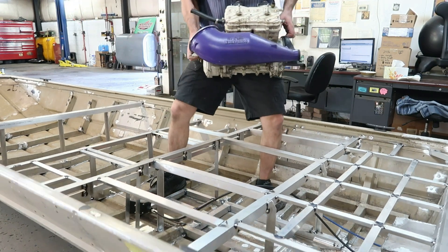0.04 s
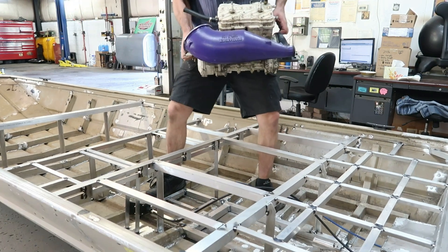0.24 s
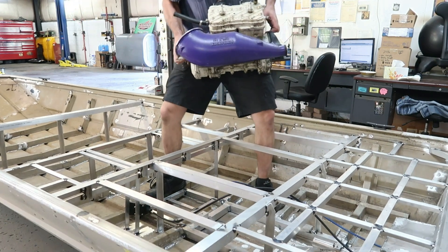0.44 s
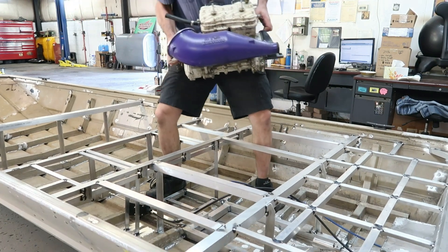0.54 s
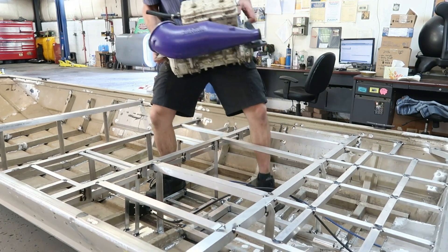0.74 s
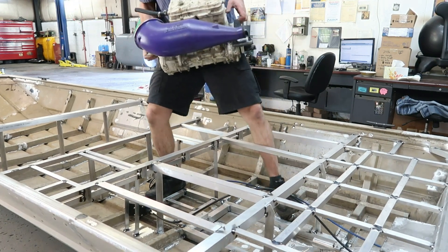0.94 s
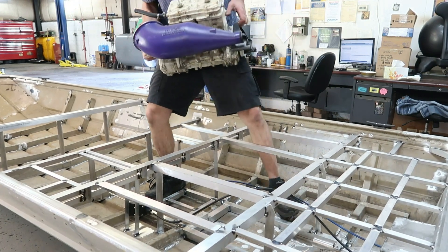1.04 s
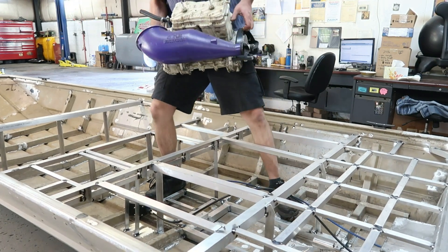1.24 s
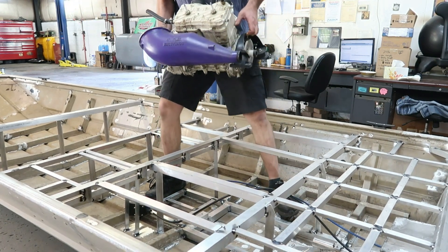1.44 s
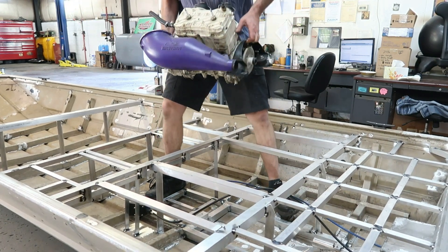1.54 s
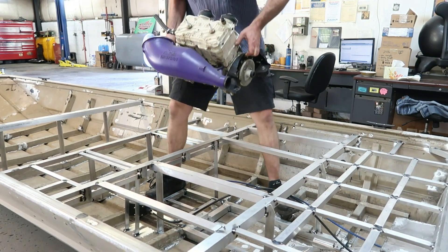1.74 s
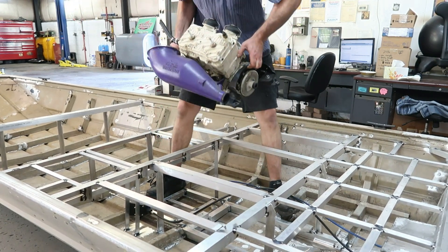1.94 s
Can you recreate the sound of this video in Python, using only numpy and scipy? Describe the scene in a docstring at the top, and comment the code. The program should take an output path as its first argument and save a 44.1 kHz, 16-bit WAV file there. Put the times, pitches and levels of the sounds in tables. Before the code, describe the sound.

Hollow metal knocks on an aluminium boat hull in a workshop. A faint ring fades over low ventilation hum and a thin whine. At 0.25 s a loud clonk hits, then a softer, duller one at 0.48 s, both with plate ring and room tail. Low hull booms and rumble continue unevenly until about 1.3 s, with shoe scuffs around 0.3-0.6 and 0.95 s. A faint boom near 1.45 s, then hum.

```python
"""Heavy engine carried across a boat's framing

Someone carrying a heavy engine steps across the framing of an aluminium boat in a workshop.
Shaped noise and wavering sines make the shop and its whine; a band of noise makes a fading metal ring.
The hollow hull booms as dying low modes over filtered rumble, under the shifting weight.
The frame knocks twice on the hull with pitch-bent partials, plate ring, echoes and a diffuse tail.
Shoes scuff and squeak on the metal as grainy and narrow-band noise."""
import sys
import numpy as np
from scipy import signal
from scipy.fft import rfft, irfft
from scipy.io import wavfile
from scipy.ndimage import uniform_filter1d

SR = 44100
rng = np.random.default_rng(int(sys.argv[2]) if len(sys.argv) > 2 else 0)


def wrap_up_sound(samples):
    """Save the sound to the file named by the first command line argument, as 16-bit audio."""
    columns = np.atleast_2d(samples).T
    # keep every value between -1 and 1, then stretch to whole-number steps
    tamed = np.clip(columns, -1, 1)
    steps = np.round(tamed * 32767).astype(np.int16)
    wavfile.write(sys.argv[1], SR, steps)


N = 88200
T, HZ = np.arange(N) / SR, np.fft.rfftfreq(N, 1 / SR)


def amp(db):
    """Decibels to gain."""
    return 10 ** (np.asarray(db) / 20)


def unit(x):
    """Scales to rms 1."""
    return x / np.sqrt(np.mean(x ** 2) + 1e-20)


def read(points, hz):
    """Reads a table on a log-frequency axis."""
    f, value = np.transpose(points)
    return np.interp(np.log(hz + 1), np.log(f + 1), value)


def level(points):
    """Gain over time from a fader curve of times and decibels."""
    return amp(np.interp(T, *np.transpose(points)))


def add(mix, s, sound):
    """Mixes a sound in at time s."""
    part = mix[..., max(round(s * SR), 0):]
    part += sound[..., :part.shape[-1]]


def tilt(hz, db_per_octave):
    """Slope in dB that crosses zero at 1 kHz and stays level below 300 Hz."""
    return db_per_octave * np.log2(np.maximum(hz, 300) / 1000)


def decay(t, t60):
    """Exponential decay that falls by 60 dB in t60 seconds."""
    return np.exp(-np.log(1000) * t / t60)


def swell(s, rise, t60):
    """Rises smoothly to a peak at s, then dies away."""
    attack = np.exp(-(np.minimum(T - s, 0) / rise) ** 2)
    return attack * decay(np.maximum(T - s, 0), t60)


def hump(peak_s):
    """Rises from nothing to 1 at peak_s, then dies away."""
    return T / peak_s * np.exp(1 - T / peak_s)


def resonance(hz, width):
    """Gain of a resonant peak, down to half at half the width either side."""
    return 1 / (1 + (2 * (HZ - hz) / width) ** 2)


def wander(seconds):
    """Random drift of rms 1, smoothed twice over the given time."""
    size = max(int(seconds * SR), 1)
    smooth = uniform_filter1d(rng.standard_normal(N), size)
    return unit(uniform_filter1d(smooth, size))


# likeness of left and right: (frequency [Hz], correlation [-1 to 1])
STEREO_LIKENESS = [(100, 1), (500, 0.97), (1000, 0.94), (2000, 0.87), (4000, 0.54), (8000, -0.046),
                   (12000, -0.28)]


def noise(colour_db):
    """Stereo noise of a given colour and rms 1, alike in the bass and wide in the treble."""
    mid, side = rfft(rng.standard_normal((2, N)))
    same = np.clip(read(STEREO_LIKENESS, HZ), -1, 1)
    mid, side = mid * np.sqrt(1 + same), side * np.sqrt(1 - same)
    return unit(irfft(np.array([mid + side, mid - side]) * amp(colour_db), N))


def modes(table, ratio=1, tilt_db=0, scatter=1):
    """Sums dying sines, one per resonance; scatter spreads their starting phases."""
    out = np.zeros(N)
    for hz, db, t60 in table:
        turns = hz * ratio * T + scatter * rng.random()
        out += amp(db + tilt(hz, tilt_db)) * decay(T, t60) * np.sin(2 * np.pi * turns)
    return out


# colour of the shop noise: (frequency [Hz], relative level [dB])
SHOP_COLOUR = [(12, -67), (20, -27), (61, -3), (80, 0.5), (118, -8), (154, -3), (226, -35.5), (259, -21),
               (412, -21.5), (587, -25), (1330, -26.5), (2630, -37.5), (3100, -38.5), (13500, -59)]
# thin whine: (centre frequency [Hz], rms level before the fader [dB])
WHINE_TONES = [(2805, -60.5), (3338, -72), (13001, -83)]
# fader of the whine: (time [s], level [dB])
WHINE_FADER = [(0, -5), (.9, -3), (1.3, 0), (2, 0)]


def shop():
    """Steady ventilation noise, and a whine of slightly wavering sines that grows a little clearer."""
    wander_hz, wander_s = 2.2, .036
    whine = np.zeros(N)
    for hz, db in WHINE_TONES:
        turns = np.cumsum(hz + wander_hz * wander(wander_s)) / SR
        whine += amp(db) * np.sqrt(2) * np.sin(2 * np.pi * turns)
    shop_db = -32.5
    return amp(shop_db) * noise(read(SHOP_COLOUR, HZ)) + whine * level(WHINE_FADER)


# resonances of the faint ring: (frequency [Hz], width at half gain [Hz], relative level [dB])
FADING_PEAKS = [(1257, 390, 1), (2150, 90, -6), (2293, 180, 2), (3320, 250, -6.5), (4022, 89, -9.5)]


def fading_ring():
    """Metal rings faintly at the start as resonant noise and dies away in the room."""
    colour = sum(amp(db) * resonance(hz, width) for hz, width, db in FADING_PEAKS)
    return amp(-42) * swell(.04, rise=.08, t60=.87) * noise(20 * np.log10(colour))


# colour of the loaded hull's rumble: (frequency [Hz], relative level [dB])
RUMBLE_COLOUR = [(25, -21), (55, -49.5), (75, -1), (140, -3), (230, -0.5), (320, -8), (430, -21),
                 (900, -23), (1500, -44), (4000, -53.5)]
# fader of the rumble: (time [s], level [dB])
RUMBLE_FADER = [(0, -39), (.225, -42), (.27, -27), (.5, -29), (.8, -30), (1.0, -30), (1.22, -30),
                (1.4, -38), (1.55, -39.5), (2, -43.5)]
# hull bottom modes: (frequency before the boom's pitch ratio [Hz], level before its tilt [dB], t60 [s])
HULL_MODES = [(69.7, -16.1, 0.46), (107.13, -14, 0.93), (132.85, 3.28, 0.29), (172.7, -7.5, 0.38),
              (199.7, -7.5, 0.71), (255, -11, 0.33), (317.4, -8.5, 0.27), (380.6, -17, 0.65)]
# weight flexes the hull bottom:
# (start time [s], level [dB], pitch ratio, tilt about the main mode [dB per octave])
HULL_BOOMS = [(.25, -20.5, 2.3, -16), (0.2683, -9.5, 0.96, 1), (0.324, -25.5, 0.75, 7.5),
              (0.3385, -11.5, 1.1, -5.5), (0.348, -30, 2.45, -1), (0.3957, -14, 0.825, -5),
              (0.4467, -16.5, 0.906, -1), (0.5002, -18.5, 0.972, -6.3), (0.591, -20, 0.66, 7),
              (0.6831, -17, 1.236, -7.5), (0.7808, -18.5, 0.96, -5), (0.865, -25, 0.676, 5),
              (0.9354, -16.5, 1.046, -2), (.938, -33.5, 1.8, 4), (0.9744, -27, 1.21, 1.5),
              (1.099, -18, 1.2, -2.5), (1.189, -26, 0.65, 6.5), (1.294, -37, 0.97, 5),
              (1.4584, -27, 1.14, -6)]


def hull():
    """Low modes swell with each shift of weight, over a rumble of flexing plates."""
    pivot_hz, rise_s = 134, .0092
    out = noise(read(RUMBLE_COLOUR, HZ)) * level(RUMBLE_FADER)
    rise = 1 - np.exp(-(T / rise_s) ** 2)
    for s, db, ratio, tilt_db in HULL_BOOMS:
        tilted = [(hz, mode_db + tilt_db * np.log2(hz / pivot_hz), t60) for hz, mode_db, t60 in HULL_MODES]
        add(out, s, amp(db) * modes(tilted, ratio, scatter=0) * rise)
    return out


# colour of the tail of a knock: (frequency [Hz], relative level before the knock's tilt [dB])
TAIL_COLOUR = [(60, -20), (280, -8), (420, -2), (560, 1), (850, 4), (1200, 3.5), (1500, -9), (2050, -6.5),
               (2500, -25.5), (5000, -36), (12000, -71)]
# how long each band of the tail lasts: (frequency [Hz], t60 [s])
TAIL_DECAY = [(100, 0.69), (800, 0.9), (2000, 0.38), (10000, 0.83)]


def room_tail(tilt_db):
    """Diffuse sound of hull and workshop, each band dying at its own speed, a little louder early on."""
    source = noise(read(TAIL_COLOUR, HZ) + tilt(HZ, tilt_db))
    hz, t, bands = signal.stft(source, SR, nperseg=512)
    bands = bands * decay(t, read(TAIL_DECAY, hz)[:, None])
    tail = signal.istft(bands, SR)[1][:, :N]
    early_db, early_s = 2, .028
    early = amp(early_db * np.exp(-T / early_s))
    return amp(-13) * tail * soft_onset() * early


def soft_onset():
    """Exponential build-up of the ring and room over some milliseconds."""
    return 1 - np.exp(-T / .007)


# partials of the hollow clonk:
# (frequency before pitch ratio, bend and sag [Hz], level before tilt [dB], time to peak [s])
CLONK_PARTIALS = [(1180, 0, .00244), (417, -11.8, .00165), (1450, -11.7, .0029), (2440, -21.7, .0026)]


def clonk_body(ratio, tilt_db, linger_db):
    """Hollow partials bend up from a flat start, then linger while their pitch sags."""
    bend, bend_s = .79, .00263  # share by which the pitch starts flat
    sag, sag_s = .457, .0131  # share by which the pitch finally drops
    falling = 1 - sag * (1 - np.exp(-(T / sag_s) ** 2))
    bent_time = np.cumsum((1 - bend * np.exp(-T / bend_s)) * falling) / SR
    linger = amp(linger_db) * hump(.016) ** 4
    out = np.zeros(N)
    for hz, db, peak_s in CLONK_PARTIALS:
        shape = hump(peak_s) ** 1.45 + linger
        out += amp(db + tilt(hz, tilt_db)) * shape * np.sin(2 * np.pi * hz * ratio * bent_time)
    return out


# ring of frame and plates: (frequency [Hz], relative level before the knock's tilt [dB], t60 [s])
PLATE_RING = [(524, -7, .45), (572, -10, .4), (608, -8, .45), (661, -7, .35), (679, -4, .4), (725, -5, .45),
              (795, -2, .45), (829, -8, .5), (894, -2, .45), (940, -4, .4), (1071, -3, .45),
              (1151, -12, .35), (1193, -8.5, .35), (1246, -11, .35), (2110, -16, .35)]
# colour of the faint tick of metal contact: (frequency [Hz], relative level [dB])
TICK_COLOUR = [(500, 18.5), (2000, 11), (4500, -1), (8000, -11.5), (13000, -31)]
# nearby surfaces throw the clonk back: (delay [s], level relative to the knock [dB])
NEAR_ECHOES = [(.0128, -18), (.0185, -15), (.0258, -10)]
# frame knocks: (time [s], level [dB], clonk pitch ratio, tilt of clonk, ring and room [dB per octave],
# then levels relative to the knock: ring [dB], room [dB], tick [dB], linger [dB])
FRAME_KNOCKS = [(.2486, -2.5, 1.0, 0, -20, -5.5, -30, -14.2),
                (.4789, -5.8, .98, -3.5, -18, -3.3, -29, -8.6)]


def knocks():
    """Each blow gives a clonk, a tick, a dull push on the hull, near echoes, plate ring and room."""
    out = np.zeros((2, N))
    thump_hz, thump_db, thump_peak_s = 41.8, -26.5, .0064
    thump = amp(thump_db) * hump(thump_peak_s) * np.sin(2 * np.pi * thump_hz * T)
    for s, db, ratio, tilt_db, ring_db, room_db, tick_db, linger_db in FRAME_KNOCKS:
        clonk = clonk_body(ratio, tilt_db, linger_db)
        ring = amp(ring_db) * modes(PLATE_RING, tilt_db=tilt_db) * soft_onset()
        room = amp(room_db) * room_tail(tilt_db)
        add(out, s, amp(db) * (clonk + thump + ring + room))
        tick = swell(s + .0018, rise=.0022, t60=.16) * noise(read(TICK_COLOUR, HZ))
        out += amp(db + tick_db) * tick
        for delay, echo_db in NEAR_ECHOES:
            add(out, s + delay, amp(db + echo_db) * clonk)
    return out


# colour of a scuff: (frequency [Hz], relative level before the scuff's tilt [dB])
SCUFF_COLOUR = [(200, -26), (450, 5), (1000, 4), (2000, 4.5), (3500, -2), (6000, -10), (10000, -21.5),
                (13500, -39)]
# shoe scuffs: (time of peak [s], level [dB], rise [s], t60 [s], tilt [dB per octave])
SHOE_SCUFFS = [(.325, -34.5, 0.042, 0.6, -1), (0.411, -45.5, 0.02, 0.39, 10),
               (0.53, -34.5, 0.019, 0.5, -1.5), (.572, -38.5, 0.017, 0.94, -2),
               (0.894, -49, 0.057, 0.41, 2), (0.92, -43.5, 0.0071, 0.45, 5.5),
               (0.951, -33, 0.044, 0.64, -5.5), (1.14, -49, 0.15, 1, -1)]
# soles rubbing the framing excite narrow resonances:
# (time of peak [s], level [dB], frequency [Hz], width at half gain [Hz], rise [s], t60 [s])
SOLE_SQUEAKS = [(.32, -55.5, 9900, 200, 0.014, 0.29), (.545, -54.5, 5460, 262, 0.055, 0.96),
                (.855, -37, 868, 71.3, 0.018, 0.4), (.96, -37, 826, 181, 0.04, 0.31)]


def scuffs():
    """Grainy noise rubs and faint narrow-band squeaks swell and die away in the room."""
    out = np.zeros((2, N))
    grain_db, grain_s = 2.6, .003
    for s, db, rise, t60, tilt_db in SHOE_SCUFFS:
        grain = amp(db + grain_db * wander(grain_s))
        out += swell(s, rise, t60) * grain * noise(read(SCUFF_COLOUR, HZ) + tilt(HZ, tilt_db))
    for s, db, hz, width, rise, t60 in SOLE_SQUEAKS:
        squeak = noise(20 * np.log10(resonance(hz, width)))
        out += swell(s, rise, t60) * amp(db) * squeak
    return out


def scene():
    """All sources together."""
    return shop() + fading_ring() + hull() + knocks() + scuffs()


def record(dry):
    """The recorder's band limit: a steep low-pass."""
    edge_hz = 13700
    lowpass = signal.firwin(401, edge_hz, window=("kaiser", 9), fs=SR)
    return signal.oaconvolve(dry, lowpass[None], "same")


dry = scene()
out = record(dry)
wrap_up_sound(out)
```